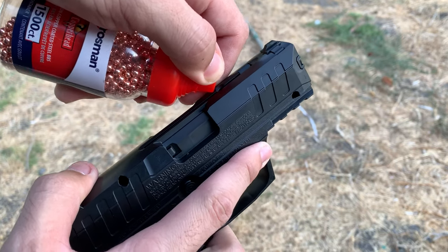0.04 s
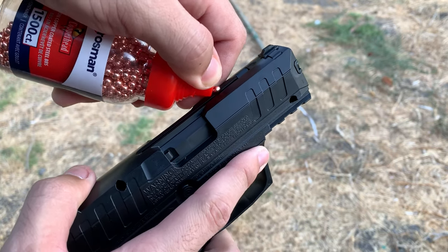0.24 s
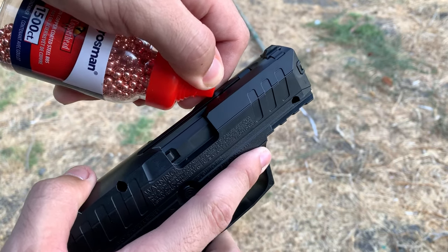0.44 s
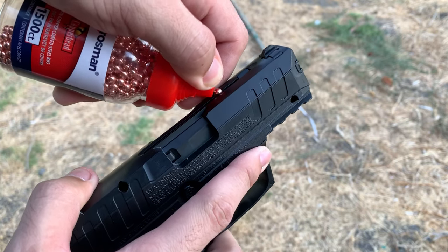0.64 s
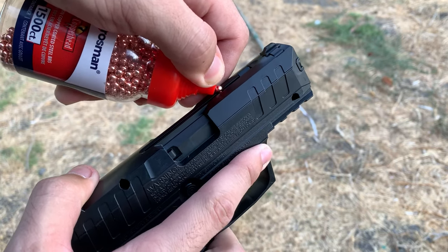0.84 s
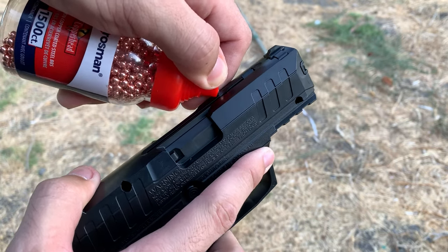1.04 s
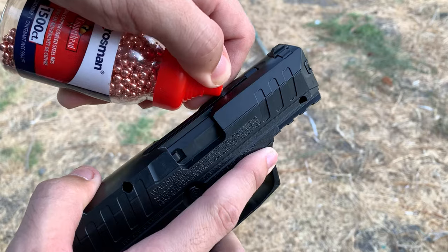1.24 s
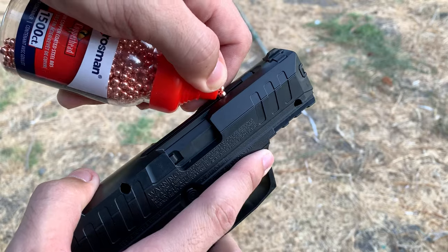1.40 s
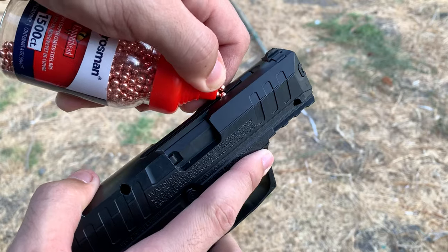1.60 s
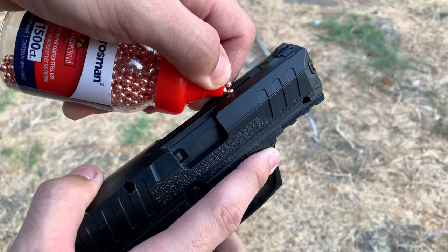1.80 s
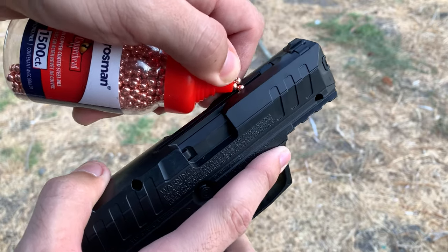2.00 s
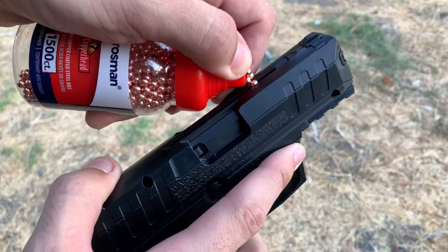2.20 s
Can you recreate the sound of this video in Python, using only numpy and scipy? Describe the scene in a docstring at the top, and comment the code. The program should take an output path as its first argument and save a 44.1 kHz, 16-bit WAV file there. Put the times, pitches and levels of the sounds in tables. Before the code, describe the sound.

Steel pellets pouring into a plastic pistol, a close, bright rattle with sharp little clacks.

```python
"""Loading steel pellets

Small steel pellets pour from a plastic bottle into a pistol, outdoors, close to a two-port microphone.
They jostle in the bottle as a dense rattle and drop one by one into the plastic magazine with sharp clacks.
The flow stalls, resumes and stops; the bottle taps the gun once over a low distant rumble."""
import sys
import numpy as np
from scipy import signal
from scipy.fft import rfft, irfft, next_fast_len
from scipy.io import wavfile
from scipy.ndimage import map_coordinates

SR = 44100
rng = np.random.default_rng(int(sys.argv[2]) if len(sys.argv) > 2 else 0)


def bounce(signal):
    """Save signal as a 16-bit WAV file at the path given by the first command-line argument."""
    frames = np.transpose(np.atleast_2d(signal))
    limited = np.clip(frames, -1, 1)
    pcm = np.round(limited * 32767).astype(np.int16)
    wavfile.write(sys.argv[1], SR, pcm)


N = 103635

# Single pellets hitting the magazine: start_s, relative_level_db, tick_over_ring_db
STRIKES = [(0.129, -35, -0.5), (0.196, -35.5, -8.5), (0.2153, -32.5, 6), (0.2471, -35.5, 1.5),
           (0.2558, -38, -7), (0.2881, -19, -10), (0.301, -23, -14), (0.3104, -27, -9.5),
           (0.3246, -31.5, -5.5), (0.338, -33, -7.5), (0.3516, -28.5, -8), (0.3556, -28.5, 1.5),
           (0.3594, -25.5, -6.5), (0.3638, -29, -6), (0.404, -15.5, -5), (0.4166, -35.5, -2),
           (0.432, -20, -7.5), (0.4487, -27.5, -11.5), (0.4627, -28.5, -9), (0.475, -29.5, -14),
           (0.5465, -30, -23.5), (0.551, -25, -22.5), (0.5849, -29.5, -6), (0.5975, -25.5, -5),
           (0.6104, -26.5, -6.5), (0.6372, -29.5, -1.5), (0.6591, -27, -16.5), (0.6623, -20, -13.5),
           (0.665, -29.5, 5.5), (0.6687, -22.5, -3), (0.7119, -22.5, -8), (0.718, -20, -12.5),
           (0.7293, -24.5, -6.5), (0.7322, -21, -6), (0.7372, -24.5, -10.5), (0.8051, -14, -11.5),
           (0.8347, -20.5, -7.5), (0.844, -23.5, -16), (0.8476, -26.5, -13), (0.8939, -26.5, -1.5),
           (0.8972, -30, 5.5), (0.902, -31.5, 11), (0.9278, -24, -9.5), (0.9349, -22.5, -10.5),
           (0.9453, -27.5, -15.5), (0.9539, -25.5, -13.5), (0.9791, -25, -11.5), (0.9875, -22, -2),
           (1.0223, -24, -8), (1.0352, -23, -12.5), (1.044, -23, -12), (1.0613, -25.5, -13),
           (1.0938, -12, -8), (1.1064, -28, -11), (1.1348, -23, -6), (1.151, -24.5, -12),
           (1.1612, -31.5, -16), (1.1698, -27, -13), (1.181, -31, -2.5), (1.189, -30.5, -2),
           (1.2375, -39.5, 3), (1.2519, -41.5, 7.5), (1.3369, -37, 0), (1.3676, -26, -7.5),
           (1.3896, -26.5, -8.5), (1.5097, -25, -9), (2.3287, -67, 9)]
# The magazine's short plastic ring: pitch_hz, relative_level_db, t60_s
MAGAZINE_MODES = [(1350, -31.5, 0.0014), (2104, -17.5, 0.011), (2650, -11.5, 0.0046), (4354, 1, 0.0052),
                  (4964, -5.5, 0.0054), (6460, -3.5, 0.0038), (7020, -4.5, 0.0033)]
# Tone of the hard contact just ahead of the ring: frequency_hz, relative_level_db
TICK_SPECTRUM = [(800, -26.5), (1500, -13.5), (4000, -16), (7500, -2.5), (9700, 8.5), (12000, -2),
                 (14000, -0.5), (16000, -13)]
STRIKE_GAIN_DB, RING_RISE_S = 19.5, 0.00038
PITCH_SPREAD, LEVEL_SPREAD_DB, DECAY_SPREAD = 0.027, 1.5, 0.22
TICK_RISE_S, TICK_LEAD_S, TICK_T60_S = 0.00019, 0.00026, 0.003


def clacks():
    """Each pellet gives a bright tick, then rings the magazine a little differently every time."""
    out, t = np.zeros((2, N)), np.arange(SR // 40) / SR
    chatter = amp(-21) * fade(t, t60=0.019)  # neighbouring pellets stir after the tick
    tick_envelope = (fade(t, TICK_T60_S) + chatter) * (1 - np.exp(-(t / TICK_RISE_S) ** 2))
    for start_s, level_db, tick_db in STRIKES:
        decay_scale = np.exp(DECAY_SPREAD * rng.normal())
        ring = np.zeros(len(t))
        for pitch_hz, mode_db, t60_s in MAGAZINE_MODES:
            envelope = amp(mode_db + LEVEL_SPREAD_DB * rng.normal()) * fade(t, t60_s * decay_scale)
            detuned_hz = pitch_hz * (1 + PITCH_SPREAD * rng.normal())
            ring += envelope * np.sin(2 * np.pi * detuned_hz * (t - RING_RISE_S))
        ring *= 1 - np.exp(-(t / RING_RISE_S) ** 2)
        tick = coloured(port_noise(len(t)), TICK_SPECTRUM) * tick_envelope
        gain = amp(level_db + STRIKE_GAIN_DB) / np.sqrt(len(t))
        add(out, start_s, gain * unit(ring))
        add(out, start_s - TICK_LEAD_S, gain * amp(tick_db) * unit(tick))
    return out


# The pour swells, stalls, resumes and dies away: time_s, level_db
FLOW_LEVEL = [(0, -47), (0.031, -59), (.11, -51), (.165, -56.5), (0.199, -41.5), (.3, -44), (0.389, -44),
              (0.432, -41), (.5, -42.5), (.6, -38), (0.649, -43), (.675, -33.5), (0.741, -31.5), (.85, -32),
              (.88, -35.5), (0.906, -32.5), (.95, -38), (0.999, -34.5), (1.119, -36.5), (1.19, -42),
              (1.22, -51.5), (1.311, -48), (1.345, -40.5), (1.448, -38.5), (1.52, -35), (1.549, -40.5),
              (1.58, -62.5), (1.7, -83)]
# Duller body of the rattle, pellet on bottle wall: frequency_hz, relative_level_db
WALL_SPECTRUM = [(200, -31.5), (700, -21.5), (1200, -14.5), (1600, -10.5), (2000, -1), (2600, 0.5),
                 (3300, -4), (4400, 3.5), (5600, -8.5), (7000, -6), (9000, -10), (16000, -21)]
# Bright edge of the rattle, pellet on pellet: frequency_hz, relative_level_db
STEEL_SPECTRUM = [(1000, -31.5), (3000, -6), (5500, -5), (8000, -2), (14000, -5), (16000, -16)]
WALL_PEAK_PER_S, WALL_DB, WALL_T60_S = 2300, -1, 0.0024
STEEL_PEAK_PER_S, STEEL_DB, STEEL_T60_S = 700, -4, 0.002


def rattle():
    """Pellets hit the bottle wall and each other: dense at full flow, separate in a trickle."""
    flow = amp(np.interp(np.arange(N) / SR, *np.transpose(FLOW_LEVEL)))
    t = np.arange(SR // 40) / SR

    def contacts(peak_per_s):
        """Random impulses of uneven strength that thin out as the flow weakens."""
        chance = peak_per_s / SR * (flow / flow.max()) ** 0.7
        hits = rng.random(N) < chance
        strength = amp(7 * np.clip(rng.standard_normal(N), -2, 1))
        return hits * strength * flow / np.sqrt(chance)

    wall_energy = signal.fftconvolve(contacts(WALL_PEAK_PER_S) ** 2, fade(t, WALL_T60_S) ** 2)[:N]
    wall = unit(coloured(np.sqrt(np.abs(wall_energy)) * port_noise(N), WALL_SPECTRUM))
    clicks, steel = contacts(STEEL_PEAK_PER_S), np.zeros((2, N))
    for i in np.flatnonzero(clicks):
        add(steel, i / SR, clicks[i] * port_noise(len(t)) * fade(t, STEEL_T60_S))
    steel = unit(coloured(steel, STEEL_SPECTRUM))
    flow_rms = np.sqrt(np.mean(flow ** 2))
    return flow_rms * (amp(WALL_DB) * wall + amp(STEEL_DB) * steel)


# Pellets settling softly inside the magazine: start_s, relative_level_db
SOFT_LANDINGS = [(0.301, -24.5), (1.3682, -23.5), (1.392, -29), (1.424, -31), (1.4292, -34.5), (1.434, -37),
                 (1.438, -36.5), (1.4986, -33), (1.5206, -34.5), (1.534, -40)]
HOLLOW_HZ, HOLLOW_T60_S, HOLLOW_SPREAD = 4480, 0.0066, 0.0069


def landings():
    """A soft landing has no tick: the magazine's hollow rings at nearly the same pitch each time."""
    out, t = np.zeros(N), np.arange(SR // 40) / SR
    envelope = fade(t, HOLLOW_T60_S) * (1 - fade(t, 2 * np.pi * RING_RISE_S))
    for start_s, level_db in SOFT_LANDINGS:
        pitch_hz = HOLLOW_HZ * (1 + HOLLOW_SPREAD * rng.normal())
        ring = np.sin(2 * np.pi * pitch_hz * t) * envelope
        add(out, start_s, amp(level_db + STRIKE_GAIN_DB) * ring / np.linalg.norm(ring))
    return out


# Tone of a dull plastic tap: frequency_hz, relative_level_db
TAP_SPECTRUM = [(400, -15.5), (1500, -0.5), (2700, 7), (3700, -7.5), (14000, -25)]
TAP_START_S, TAP_DB = 2.1645, -29.5


def bottle_tap():
    """The bottle knocks lightly on the gun as it is drawn back."""
    out, t = np.zeros(N), np.arange(SR // 20) / SR
    knock = coloured(rng.standard_normal(len(t)), TAP_SPECTRUM) * fade(t, t60=0.016)
    add(out, TAP_START_S, amp(TAP_DB) * knock / np.linalg.norm(knock))
    return out


# How far the left port leads the right: frequency_hz, phase_rad
PORT_LEAD = [(0, 3), (600, 0.5), (2000, 3.5), (3000, 3.5), (4300, 6), (5000, 5.1), (6200, 7), (7000, 8),
             (8500, 3), (11900, -3.5), (15000, -10)]
# How much louder the left port is than the right: frequency_hz, balance_db
PORT_PAN = [(700, -7.5), (1500, 10.5), (2300, 1.5), (3200, -2), (4500, -0.5), (5800, -10), (6700, -2),
            (7400, 1.5), (8300, 1.5), (16000, -1.5)]


def ports(x):
    """Close sound reaches the microphone's two ports with different delay and colour."""
    sides = np.array([[0.5], [-0.5]])

    def response(hz):
        lead_rad = np.interp(hz, *np.transpose(PORT_LEAD))
        return amp(sides * along(PORT_PAN, hz)) * np.exp(1j * sides * lead_rad)
    return filtered(x, response)


def scatter(x, t60):
    """Scattered reflections make a diffuse stereo tail that changes from moment to moment."""
    out, t, block = np.zeros((2, N)), np.arange(SR // 5) / SR, SR // 25
    for i in range(0, N, block):
        tail = rng.standard_normal((2, len(t))) * fade(t, t60)
        tail /= np.linalg.norm(tail[0])
        add(out, i / SR, signal.fftconvolve(x[:, i:i + block], tail, axes=1))
    return out


# Outdoor bed, heavy lows under a thin hiss: frequency_hz, relative_density_db
AIR_SPECTRUM = [(21, -28.5), (35, 3), (118, -5), (196, -13.5), (343, -13.5), (489, -17.5), (922, -27),
                (1610, -34), (15000, -58)]
# Stereo image of the bed, centred lows and wide highs: frequency_hz, left_right_correlation
AIR_CORRELATION = [(60, 0.95), (250, 0.98), (600, 0.65), (1400, -0.17), (4000, .1), (12000, -0.32)]
AIR_DB, GUST_DB, GUST_BELOW_HZ = -48.5, 1.5, 150


def open_air():
    """A wide, thin hiss over a low rumble that gusts gently."""
    def mid_side_response(hz):
        width_rad = np.arccos(np.clip(along(AIR_CORRELATION, hz), -1, 1)) / 2
        side_gain = np.tan(np.minimum(width_rad, 1))
        return amp(along(AIR_SPECTRUM, hz)) * np.array([np.ones_like(hz), side_gain])
    mid, side = filtered(rng.standard_normal((2, N)), mid_side_response)
    air = amp(AIR_DB) * unit(np.array([mid + side, mid - side]))
    rumble = filtered(air, lambda hz: np.exp(-(hz / GUST_BELOW_HZ) ** 2))
    return air + (amp(GUST_DB * wobble(per_s=8)) - 1) * rumble


# Low tones of a far-off drone: pitch_hz, level_db
DRONE_TONES = [(71, -50.5), (115, -59.5), (173, -69)]
# The drone recedes as the pour ends: time_s, gain_db
DRONE_FADE = [(1.3, 0), (1.6, -4.5)]


def distant_drone():
    """Three low tones far away, each wavering in level and pitch."""
    out, t = np.zeros(N), np.arange(N) / SR
    for pitch_hz, level_db in DRONE_TONES:
        peak = np.sqrt(2) * amp(level_db + 3.7 * wobble(per_s=11))
        out += peak * np.sin(2 * np.pi * pitch_hz * t + 1.1 * wobble(per_s=5.6))
    return amp(np.interp(t, *np.transpose(DRONE_FADE))) * out


def port_noise(size):
    """Stereo noise, mostly shared by the two ports, with a weaker part for each alone."""
    return rng.standard_normal(size) + amp(-6.5) * rng.standard_normal((2, size))


def amp(db):
    """Decibels to gain."""
    return 10 ** (np.asarray(db) / 20)


def unit(x):
    """Scale to rms 1."""
    return x / np.sqrt(np.mean(x ** 2) + 1e-20)


def along(points, hz):
    """Read a curve of (frequency_hz, value) points on a log frequency axis."""
    knots_hz, values = np.transpose(points)
    return np.interp(np.log(hz + 1), np.log(np.abs(knots_hz) + 1), values)


def filtered(x, response):
    """Filter x by a complex gain, given as a function of frequency."""
    size = x.shape[-1]
    padded = next_fast_len(2 * size)
    return irfft(rfft(x, padded) * response(np.fft.rfftfreq(padded, 1 / SR)), padded)[..., :size]


def coloured(x, spectrum):
    """Equalise x with a (frequency_hz, level_db) curve, keeping its energy."""
    shaped = filtered(x, lambda hz: amp(along(spectrum, hz)))
    return shaped * np.linalg.norm(x) / np.linalg.norm(shaped)


def fade(t, t60):
    """A decay of 60 dB in t60 seconds."""
    return np.exp(-np.log(1000) * t / max(t60, 1e-4))


def wobble(per_s):
    """A smooth random curve with per_s knots a second."""
    knots = rng.standard_normal(int(N * per_s / SR) + 4)
    return map_coordinates(knots, [np.arange(N) * per_s / SR])


def add(track, start_s, sound):
    """Mix a sound into a track at a time."""
    part = track[..., max(round(start_s * SR), 0):][..., :sound.shape[-1]]
    part += sound[..., :part.shape[-1]]


def scene():
    """The pour up close, its reflections and the outdoor background."""
    pour = clacks() + landings() + rattle() + bottle_tap()
    near = ports(pour) + amp(-4.5) * scatter(pour, t60=0.02)  # scatter off hands and gun
    add(near, start_s=0.0088, sound=amp(-17.5) * pour)  # one echo from the ground
    yard_tail = amp(-24) * scatter(pour, t60=0.05)
    return near + yard_tail + open_air() + distant_drone()


DIP_WIDTH_HZ, LOW_CUT_HZ, TOP_HZ = 610, 37, 16000


def record(dry):
    """The microphone notches the treble; the recorder clips at full scale and cuts both band ends."""
    def dip(hz, centre_hz, gain_db):
        return amp(gain_db * np.exp(-((hz - centre_hz) / DIP_WIDTH_HZ) ** 2))
    notched = filtered(dry, lambda hz: dip(hz, 8650, -3) * dip(hz, 11900, -2))
    clipped = np.clip(notched, -1, 1)
    return filtered(clipped, lambda hz: (hz < TOP_HZ) * (1 - 1 / (1 + (hz / LOW_CUT_HZ) ** 10)))


dry = scene()
out = record(dry)
bounce(out)
```